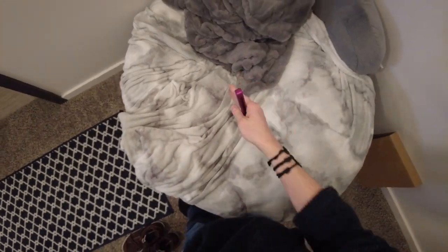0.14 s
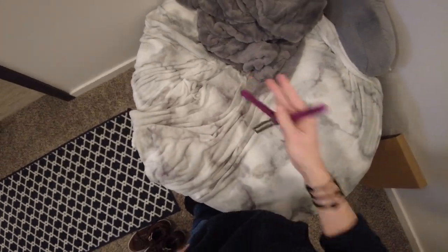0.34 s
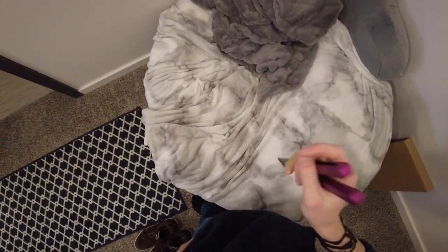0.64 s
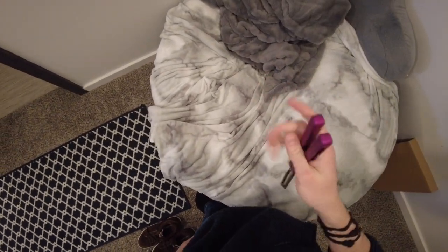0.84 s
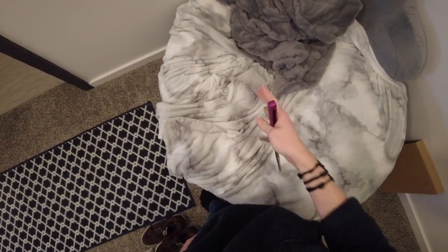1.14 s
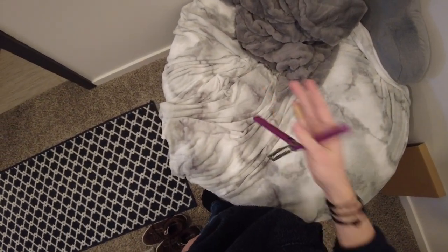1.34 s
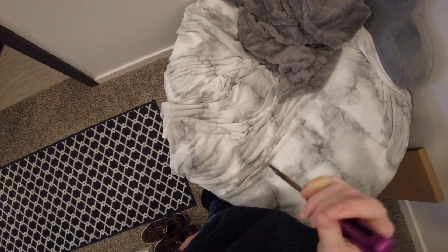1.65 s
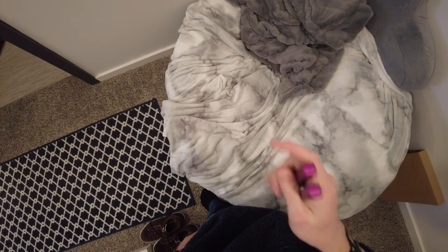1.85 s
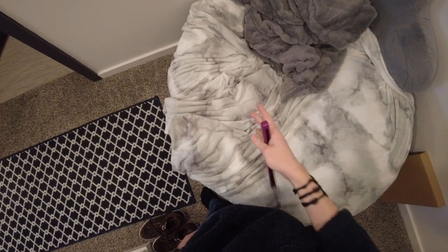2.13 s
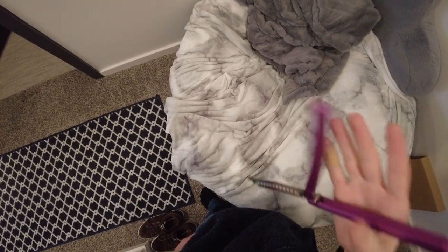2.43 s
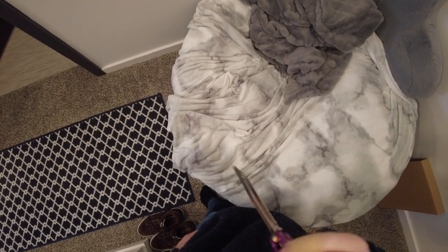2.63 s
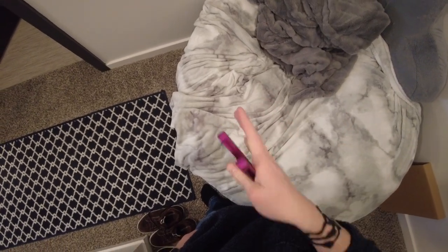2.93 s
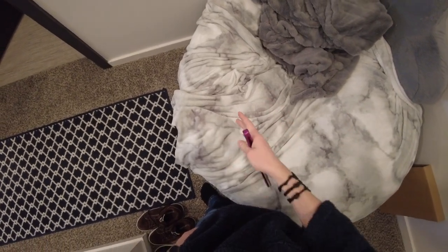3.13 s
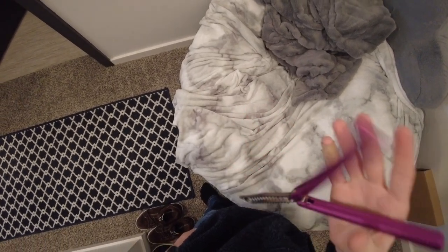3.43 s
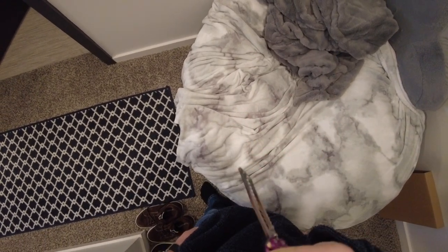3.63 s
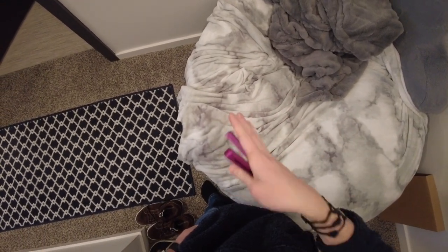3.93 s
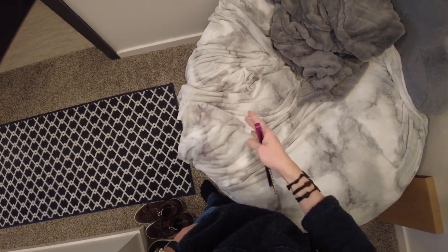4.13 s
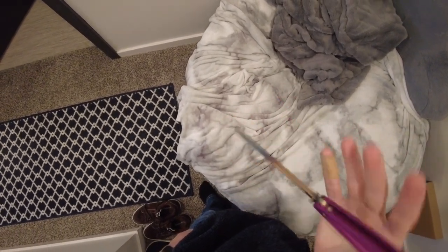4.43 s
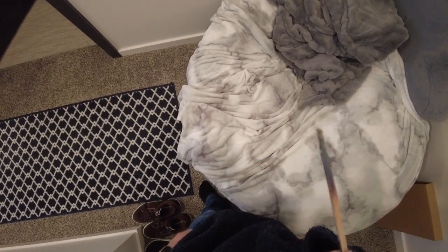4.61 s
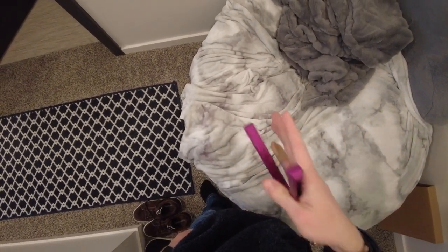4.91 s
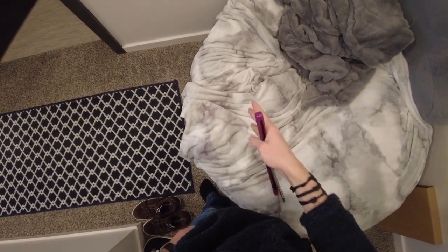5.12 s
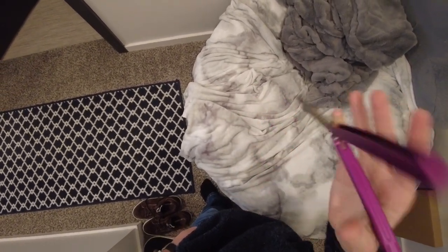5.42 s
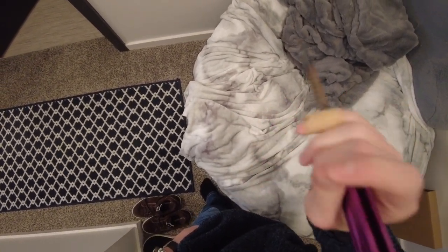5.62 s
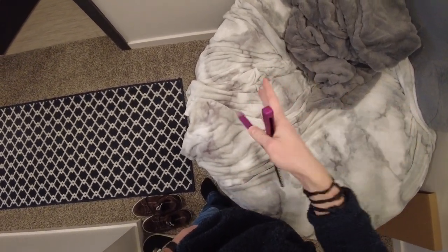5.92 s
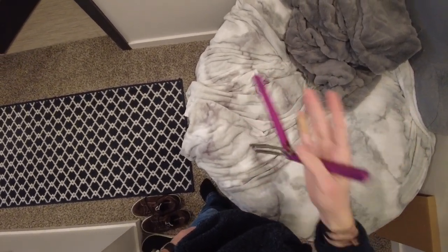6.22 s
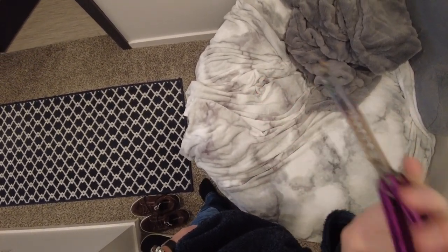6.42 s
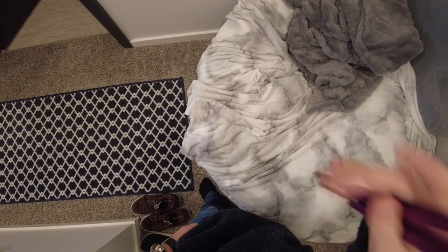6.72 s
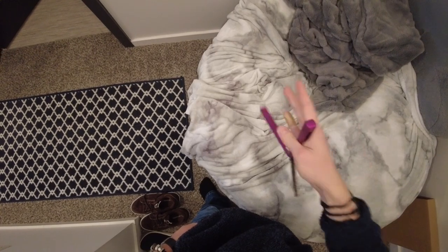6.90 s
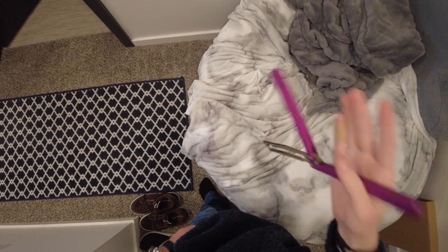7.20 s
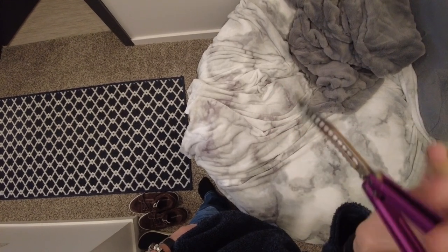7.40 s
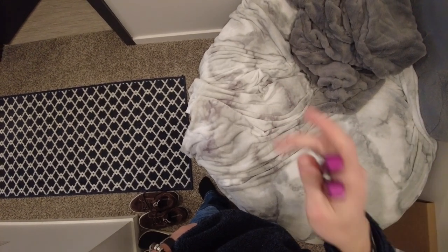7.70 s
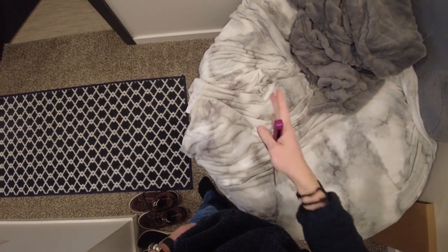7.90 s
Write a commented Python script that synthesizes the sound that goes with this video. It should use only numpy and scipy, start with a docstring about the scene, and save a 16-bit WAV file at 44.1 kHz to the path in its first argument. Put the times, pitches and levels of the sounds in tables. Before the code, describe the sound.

Metal handles of a flipped practice knife click and clatter shut about once a second, with brief bright ringing in a small room.

```python
"""A folding practice knife is flipped over a bed in a small carpeted room. First come a faint rumble, a low hum
and hiss, which stay throughout, and a soft rustle of the palm. Then the loose handle swings and stops twice
against the hand, and the room answers each tap. Next the handles meet and bounce on each other, faster and
faster, until they buzz to rest. This happens eight times, and now and then metal left free in the hand, or the
handles just closed, ring on."""
import sys
import numpy as np
from scipy import signal
from scipy.fft import rfft, irfft, next_fast_len
from scipy.io import wavfile
from scipy.ndimage import map_coordinates

SR = 44100
rng = np.random.default_rng(int(sys.argv[2]) if len(sys.argv) > 2 else 0)


def unload_wav(signal):
    """Save mono or channel-first audio to the path in sys.argv[1] as 16-bit WAV at rate SR, clipped to [-1, 1]."""
    wavfile.write(
        sys.argv[1],
        SR,
        np.round(np.clip(np.atleast_2d(signal).T, -1, 1) * 32767).astype(np.int16),
    )


N = 355049

# Tone colour of the rumble, the dull room noise and the microphone hiss: pitch_hz, relative_db
RUMBLE_COLOUR = [(8.8, -22), (15, 5.5), (39, 1), (91, -16.5), (119, -21), (150, -46), (200, -49),
                 (330, -120)]
AIR_COLOUR = [(88, -26.5), (150, -4.5), (350, -12), (382, -18.5), (416, -12), (681, -22.5), (1500, -25.5),
              (1950, -60), (3300, -120)]
HISS_COLOUR = [(700, -120), (1000, -3), (2500, -1), (6000, -8), (10000, -13), (12500, -20.5), (15000, -41)]
# The rumble swells as the body moves: time_s, level_db
RUMBLE_SWELLS = [(0.0, -64.5), (0.15, -62.5), (3.0, -62), (5.11, -65), (5.29, -57.5), (5.65, -65.5),
                 (5.94, -51.5), (6.14, -64), (6.39, -46), (6.7, -62.5), (7.2, -57.5), (7.33, -60),
                 (7.44, -48.5), (7.87, -65.5), (7.98, -52.5), (8.05, -51.5)]
# Narrow bands of hum: pitch_hz, level_db
HUM_BANDS = [(120, -79), (170, -86), (255, -87)]
# How alike the noise is in both ears: pitch_hz, likeness (1 is the same, 0 is unrelated)
EAR_LIKENESS = [(60, 1), (130, 0.96), (290, 0.64), (640, 0), (1400, 0.064), (5000, 0.52), (15000, 0.16)]
# The palm shifts on the handle: middle_s, width_s, level_db
PALM_SHIFTS = [(0.112, 0.033, -64.5), (1.28, 0.014, -63.5)]
# Single hits on the hand, and the handles' first meeting. A lean above 0 is louder on the left:
# start_s, clack_db, clack_hz, clink_db, sizzle_db, knock_db, lean_db, rebound_loss_db
SINGLE_TAPS = [(0.2246, -49, 1926, -49, -49, -58.5, -4, 27), (0.3853, -58, 2190, -52, -57.5, -64, 2, 35),
               (0.3902, -45.5, 2220, -42.5, -49, -68.5, -2, 16),
               (0.4163, -53, 2170, -54, -53.5, -74, -4, 36), (0.5981, -40, 2065, -50, -40, -71, -5, 18),
               (0.9659, -73, 2330, -61, -60, -80, -4, 32), (1.2442, -44, 2160, -45.5, -56.5, -70, 1, 14),
               (1.2733, -44.5, 2090, -50, -51.5, -63, -2, 10),
               (1.4198, -42, 2210, -43.5, -49, -67, 1.5, 15),
               (1.4676, -49.5, 2110, -53.5, -55.5, -69, -4, 24),
               (1.5972, -33.5, 2283, -55, -43, -70, -4.5, 32.5),
               (2.214, -42.5, 2340, -47.5, -51, -55.5, -1, 32),
               (2.348, -44.5, 2155, -44.5, -53.5, -62, 6, 33),
               (2.5568, -33, 2312, -39, -34.5, -58.5, -3, 29),
               (3.1983, -38, 2425, -46.5, -41.5, -50, -3, 30), (3.3425, -40.5, 2253, -35, -45, -59, -1, 16),
               (3.3656, -49, 2386, -40, -49.5, -66, 2, 14), (3.5222, -30, 2220, -53.5, -36.5, -55, -3, 30),
               (3.9708, -53, 2314, -68, -73, -72, -2, 33.5), (4.122, -50.5, 2290, -68, -64, -77, 1, 29),
               (4.1685, -41, 2253, -66, -47.5, -56, -0.5, 29.5),
               (4.285, -42.5, 2223, -40, -50.5, -65.5, -0.5, 11),
               (4.4653, -29, 2182, -52, -34.5, -54.5, -2, 22),
               (5.161, -34, 2020, -34.5, -36.5, -46, 0.5, 19.5),
               (5.299, -40, 2250, -34.5, -45.5, -60, 0, 9.5), (5.3378, -44.5, 2250, -44, -45.5, -69, 1, 13),
               (5.5064, -39.5, 2295, -48, -41.5, -60.5, -1, 30), (5.917, -69, 2430, -70, -71, -84, -1, 30),
               (6.0852, -39.5, 2080, -40.5, -45.5, -51, 1, 14),
               (6.2288, -40.5, 2275, -33, -43, -58.5, -1, 15), (6.2633, -53, 2420, -42, -54.5, -69, 0, 6),
               (6.3837, -38, 2170, -44, -35.5, -53, -4, 26.5), (6.8439, -57, 2370, -65, -68, -84, -1, 25.5),
               (7.0677, -37, 2117, -39, -41.5, -49.5, 2.5, 24),
               (7.2219, -39, 2380, -49, -38.5, -69, -1, 27), (7.2242, -47, 2300, -40.5, -53, -68, 1, 6),
               (7.2682, -47, 2130, -44, -52, -69, -2, 28), (7.3786, -40, 2110, -43, -40, -55.5, -5, 30),
               (7.8328, -62, 2450, -62, -69, -89, 1, 26.5), (8.0334, -39.5, 1960, -43, -47, -51, -1, 10)]
# A hit rings groups of tones in the handles and blade. A fade_s is the time to fall by 60 dB.
# Tones that follow the hit's pitch: pitch_ratio, level_db, free_ring_s, after_ring_db, fade_s
CLACK_TONES = [(1, 1, 0.0037, -28, 0.23), (.93, -32, 0.0035, -25, .06)]
CLINK_TONES = [(0.997, 2, 0.0016, -23.5, 0.12), (1.2, -4.5, 0.00043, -20.5, 0.05)]
# Fixed tones of the metal and the air between the handles:
# pitch_hz, level_db, free_ring_s, after_ring_db, fade_s
SIZZLE_TONES = [(4530, -4, 0.0012, -10, 0.062), (3900, -13.5, 0.00045, -16, 0.019),
                (5985, 0, 0.00095, -14, 0.027), (6528, -9.5, 0.0041, -10.5, 0.11),
                (7386, -12.5, 0.0039, -6.5, 0.12), (7614, -11, 0.003, -8.5, 0.093),
                (5380, -20, 0.0024, -11.5, 0.033), (8060, -23.5, 0.00024, -13.5, 0.1),
                (9500, -14, 0.00085, -10.5, 0.045), (10820, -15.5, 0.0038, -6.5, 0.17),
                (12000, -27, 0.0012, -12.5, .05), (13020, -15.5, .002, -18.5, .04),
                (14600, -16, 0.0026, -2.5, 0.098)]
KNOCK_TONES = [(540, 2, 0.0014, -12.5, .06), (1843, 7, 0.0013, -11, 0.059), (700, -7.5, 0.004, -17, .04)]
BODY_TONES = [(1303, -28.5, 0.0024, 1.5, .05), (928, -30.5, 0.0027, -10.5, .04),
              (1764, -24, 0.0006, -13, 0.1)]
PUFF_TONES = [(1205, 3.5, .0012, -39.5, .01), (620, -11.5, 0.00083, -37.5, .01)]
# Echoes off the hand, bed and wall: left_delay_s, right_delay_s, relative_db
NEAR_SURFACES = [(.0021, .0026, -18.5), (.0038, .0033, -8), (.0082, .0091, -9)]
# How long the room rings: pitch_hz, fade_s
ROOM_FADES = [(300, 0.3), (1200, 0.27), (2300, .25), (3000, 0.3), (4500, 0.29), (8000, 0.28), (15000, 0.11)]
# A flurry is one run of hits as the handles close: start_s, end_s, last_clack_hz, clink_top_s,
# clink_top_hz, last_clink_hz, sizzle_db, knock_db, first_lean_db, room_before_db, room_during_db
FLURRY_SHAPES = [(.6, 0.771, 2400, .69, 3150, 2890, -37, -68, -4, -0.5, -3),
                 (1.602, 1.825, 2410, 1.71, 3327, 3010, -36, -70.5, -2.5, -4.5, -5.5),
                 (2.56, 2.816, 2553, 2.715, 3430, 2960, -36, -67, -3, 0.5, -10.5),
                 (3.52, 3.8, 2460, 3.72, 3470, 2615, -36, -63, -3, -2.5, -10.5),
                 (4.49, 4.785, 2567, 4.665, 3220, 2770, -37.5, -71, -4, 0, -12.5),
                 (5.566, 5.722, 2540, 5.63, 3100, 2860, -33.5, -71, -7, -3, -9.5),
                 (6.42, 6.663, 2470, 6.64, 3360, 3100, -37, -66, -6, -4.5, -8.5),
                 (7.397, 7.694, 2200, 7.575, 3530, 2680, -36, -55.5, -7.5, -4, -8)]
# The handles rattle on each other, with full and dull clinks by turns: start_s, clack_db, clink_db
RATTLE_HITS = [(0.6363, -34, -35.5), (.656, -34.5, -40), (0.6667, -30.5, -35.5), (0.6761, -32.5, -53),
               (0.6871, -32.5, -40), (1.6271, -28.5, -36.5), (1.6487, -27.5, -48), (1.6545, -43.5, -45.5),
               (1.6664, -23.5, -39), (1.6758, -44, -49), (1.6832, -28.5, -52.5), (1.6919, -35.5, -48),
               (1.6976, -25, -34), (1.7099, -28.5, -50), (1.721, -25, -37.5), (1.7313, -25.5, -44),
               (2.5822, -24.5, -38), (2.5993, -22, -41), (2.6156, -25.5, -28.5), (2.6294, -30, -49.5),
               (2.6482, -26, -30.5), (2.6746, -35, -46.5), (2.6979, -26.5, -31), (2.7093, -29, -47.5),
               (2.716, -21.5, -24), (2.7203, -27.5, -33.5), (2.7269, -27, -24.5), (2.733, -35, -35.5),
               (2.7396, -27.5, -22), (2.7495, -26.5, -24.5), (2.758, -29.5, -28), (3.5536, -24.5, -32.5),
               (3.5814, -27, -52), (3.6073, -23, -34), (3.6348, -27.5, -46), (3.66, -22.5, -28),
               (3.6817, -27.5, -42.5), (3.6946, -23, -28.5), (3.7029, -25.5, -42.5), (3.7096, -24.5, -24),
               (3.7169, -28, -39), (3.7241, -26, -24), (3.7387, -28, -21), (3.751, -32.5, -28.5),
               (3.756, -32, -29), (4.5033, -24, -38.5), (4.5402, -32, -46), (4.5746, -21, -30),
               (4.6081, -30, -41), (4.6245, -19.5, -25.5), (4.633, -24.5, -38.5), (4.6424, -20, -23.5),
               (4.6533, -35, -43), (4.6645, -29, -26.5), (4.68, -34, -48), (4.7162, -33, -40),
               (4.7366, -41, -50), (4.7527, -39.5, -34.5), (5.5645, -33, -36), (5.5837, -32, -44.5),
               (5.5931, -26.5, -35), (5.6, -27, -51), (5.607, -36, -30), (5.6161, -35, -48),
               (5.6274, -29.5, -43), (5.64, -41, -39), (5.6516, -30.5, -35), (5.6602, -36, -43),
               (5.6673, -31.5, -34.5), (6.4181, -30.5, -36), (6.446, -34, -58), (6.4705, -28, -33.5),
               (6.5011, -35, -42.5), (6.519, -30.5, -29), (6.5304, -31, -35.5), (6.5393, -32.5, -23.5),
               (6.5485, -32, -31), (6.5586, -33, -26), (6.5685, -42, -46), (6.583, -37, -37),
               (6.6007, -52, -40), (6.6197, -39.5, -32), (6.6319, -48, -44), (6.6392, -37.5, -38),
               (6.6444, -41, -32), (7.4262, -33, -30), (7.4573, -29.5, -52.5), (7.4818, -31.5, -29.5),
               (7.5008, -29, -51), (7.5168, -27, -32), (7.5212, -46, -49), (7.5298, -27.5, -43.5),
               (7.5421, -28, -29.5), (7.554, -30, -41), (7.5656, -33, -30), (7.5764, -30.5, -45),
               (7.5871, -36, -28), (7.5956, -32.5, -36), (7.6051, -38.5, -28), (7.6115, -31, -35)]
# The quick bounces that end each flurry: start_s, first_gap_s, gap_ratio, clack_db, clink_db, puff_db
BOUNCE_RUNS = [(.696, .007, 0.91, -43.5, -42, -57), (1.7388, .007, 0.92, -32.5, -32.5, -42),
               (2.7663, .0062, 0.87, -31, -25.5, -40), (3.762, .0066, 0.87, -30.5, -28.5, -42.5),
               (4.7631, .006, 0.69, -51, -62.5, -64), (5.6754, .0058, 0.84, -36.5, -32.5, -48),
               (6.651, .0068, 0.69, -39, -42, -72), (7.618, .0053, 0.91, -35.5, -29, -41.5)]
# Thin tones ring on, from metal left free in the hand or from the closed handles after a flurry: # start_s,
# level_db, pitch_hz, fade_s
LINGERING_TONES = [(.9645, -61, 2370, 0.18), (1.2446, -55, 2340, 0.19), (1.2742, -53.5, 2336, 0.16),
                   (2.806, -47, 3000, 0.35), (3.8, -44.5, 2697, .34), (6.8431, -64.5, 2330, .15),
                   (7.669, -50, 2826, 0.31)]

TIME_S = np.arange(N) / SR
CLACK_HZ, CLINK_HZ = 2334, 2828  # resting pitches


def amp(db):
    """Turn decibels into a number to multiply by."""
    return 10 ** (np.asarray(db) / 20)


def along(points, hz):
    """Read between the rows of a (pitch_hz, value) table on a log pitch scale."""
    pitches, values = np.transpose(points)
    return np.interp(np.log(hz + 1), np.log(pitches + 1), values)


def wobble(per_s):
    """A smooth curve through per_s random points a second."""
    return map_coordinates(rng.standard_normal(int(N * per_s / SR) + 4), [TIME_S * per_s])


def filtered(sound, gain):
    """Turn each frequency of a sound up or down by gain(hz)."""
    size = next_fast_len(N + SR // 2)
    return irfft(rfft(sound, size) * gain(np.fft.rfftfreq(size, 1 / SR)), size)[..., :N]


def stereo_noise(gain):
    """Noise of average power 1, coloured by gain(hz) and alike in both ears in the bass."""
    def split(hz):
        angle = np.arccos(np.clip(along(EAR_LIKENESS, hz), -1, 1)) / 2
        return gain(hz) * [np.cos(angle), np.sin(angle)]
    shared, opposite = filtered(rng.standard_normal((2, N)), split)
    noise = np.array([shared + opposite, shared - opposite])
    return noise / np.sqrt(np.mean(noise ** 2) + 1e-20)


def noise_band(middle_hz, half_width_hz):
    """Noise gathered around one pitch."""
    return stereo_noise(lambda hz: 1 / (1 + ((hz - middle_hz) / half_width_hz) ** 2))


def background():
    """Rumble that swells as the body moves, dull room noise, a wavering hum and microphone hiss."""
    coloured = lambda colour: stereo_noise(lambda hz: amp(along(colour, hz)))
    rumble_db = np.interp(TIME_S, *np.transpose(RUMBLE_SWELLS)) + 2.5 * wobble(4.4)
    rumble = amp(rumble_db) * coloured(RUMBLE_COLOUR) * amp([[-1.4], [1.4]])  # louder on the right
    flurry_ends = sum(np.exp(-((TIME_S - end) / 0.09) ** 2) for _, end, *_ in FLURRY_SHAPES)
    air = amp(-79 + 5 * flurry_ends + 2.4 * wobble(16)) * coloured(AIR_COLOUR)
    hum = sum(amp(db) * noise_band(hz, half_width_hz=6) for hz, db in HUM_BANDS)
    hiss_db = -83.5 + 0.7 * wobble(1.8) + 5.5 * np.exp(-TIME_S / 0.26)  # louder at first
    return rumble + air + hum + amp(hiss_db) * coloured(HISS_COLOUR)


def palm_rustle():
    """Skin slides on metal in soft, dull swells."""
    swell = sum(amp(db) * np.exp(-((TIME_S - middle) / width) ** 2) for middle, width, db in PALM_SHIFTS)
    return swell * noise_band(600, half_width_hz=300)


def tap_hits(rebounds=3, flight_s=0.0056, caught_db=20):
    """List the single taps. The handle rebounds unless it loses so much that the hand catches it."""
    taps = np.array(SINGLE_TAPS)
    delays_s = np.cumsum(flight_s * (1 + 0.12 * rng.standard_normal((len(taps), rebounds))), axis=1)
    is_time = np.array([1, 0, 0, 0, 0, 0, 0])
    is_level = np.array([0, 1, 0, 1, 1, 1, 0])
    hits = list(taps[:, :-1])
    for tap, loss_db, delays in zip(taps[:, :-1], taps[:, -1], delays_s):
        if loss_db < caught_db:
            for k, delay in enumerate(delays):  # each further rebound is 1 dB softer
                hits.append(tap + delay * is_time - (loss_db + k) * is_level)
    start_s, clack_db, clack_hz, clink_db, *rest = np.transpose(hits)
    return np.array([start_s, clack_db, clack_hz, clink_db, np.full_like(start_s, CLINK_HZ), *rest])


def ring(start_s, level_db, lean_db, tones, pitch_scale=1, detune=0, scatter_db=0, spread=0, loose=0):
    """Each hit rings freely for a moment, until the grip chokes it to a weak, unsteady after-ring."""
    t = np.arange(SR // 16, dtype=np.float32) / SR
    chance = rng.standard_normal((len(start_s), len(tones), 4), dtype=np.float32)
    steps = rng.standard_normal((len(start_s), len(t)), dtype=np.float32)
    drift = loose * np.cumsum(steps, axis=1)  # slack in the pivots
    soft_edges = (1 - np.exp(-t / 0.000081)) * np.cos(np.pi / 2 * t / t[-1])
    left, right = np.zeros((2, len(start_s), len(t)))
    for tone, luck in zip(tones, chance.transpose(1, 2, 0)[..., None]):
        pitch, db, free_s, after_db, fade_s = tone
        pitch_luck, level_luck, left_luck, right_luck = luck
        dying = np.exp(-(t / free_s) ** 3) + amp(after_db - 60 * t / fade_s)
        size = amp(db + scatter_db * level_luck) * dying * soft_edges
        hz = pitch * np.reshape(pitch_scale, (-1, 1)) * (1 + detune * pitch_luck)
        phase = 2 * np.pi * hz * t + drift
        left += size * np.sin(phase + spread * left_luck)  # a tone reaches each ear from its own angle
        right += size * np.sin(phase + spread * right_luck)
    left *= amp(level_db + lean_db / 2)[:, None]
    right *= amp(level_db - lean_db / 2)[:, None]
    places = np.round(start_s * SR).astype(int)[:, None] + np.arange(len(t))
    return np.array([np.bincount(places.ravel(), ear.ravel(), N)[:N] for ear in (left, right)])


def cut_bass(sound, hz):
    """Weaken everything below hz."""
    return signal.sosfilt(signal.butter(2, hz, "high", fs=SR, output="sos"), sound)


def bright_metal(hits):
    """Every hit rings the same metal: a clack, a higher clink and a thin sizzle on top."""
    start_s, clack_db, clack_hz, clink_db, clink_hz, sizzle_db, _, lean_db = hits
    clack = ring(start_s, clack_db, 0.1 * lean_db, CLACK_TONES, clack_hz,
                 detune=0.009, scatter_db=0.3, spread=0.25, loose=0.07)
    clink = ring(start_s, clink_db, 0.3 * lean_db, CLINK_TONES, clink_hz,
                 detune=0.005, scatter_db=1.5, spread=0.25, loose=0.06)
    sizzle = ring(start_s, sizzle_db, lean_db, SIZZLE_TONES,
                  detune=0.0068, scatter_db=3, spread=0.92, loose=0.15)
    return cut_bass(cut_bass(clack + clink + sizzle, hz=1150), hz=1000)


def dull_knocks(hits):
    """The low part of a hit: a knock, and air that the closing handles push with the whole blow."""
    start_s, clack_db, _, clink_db, _, _, knock_db, lean_db = hits
    whole_db = 10 * np.log10(amp(clack_db) ** 2 + amp(clink_db) ** 2)
    knock = ring(start_s, knock_db, 0.085 * lean_db, KNOCK_TONES,
                 detune=0.032, scatter_db=3, spread=0.56, loose=0.072)
    body = ring(start_s, whole_db, 0.11 * lean_db, BODY_TONES,
                detune=0.034, scatter_db=0.5, spread=0.78, loose=0.053)
    return cut_bass(knock + body, hz=267)


def arm_reach_db(pull_in_s=0.18, hold_s=0.14):
    """More room is heard with the arm out for the taps, less with it pulled in for a flurry."""
    points = []
    for start, end, *_, before_db, during_db in FLURRY_SHAPES:
        points += [(start - pull_in_s, before_db), (start, during_db), (end + hold_s, during_db)]
    return np.interp(TIME_S, *np.transpose(points))


def near_echoes(sound):
    """The nearest surfaces each send back one copy within a hundredth of a second."""
    delayed = lambda ear, delay_s: np.pad(ear, (round(delay_s * SR), 0))[:N]
    return sum(amp(db) * np.array([delayed(sound[0], left_s), delayed(sound[1], right_s)])
               for left_s, right_s, db in NEAR_SURFACES)


def room_ring(sound, tail_count=4):
    """The room rings briefly after each hit, with a soft, diffuse tail."""
    hz, t, noise = signal.stft(rng.standard_normal((tail_count, 2, SR // 2)), SR, nperseg=128)
    fading = amp(-60 * t / along(ROOM_FADES, hz)[:, None])  # each pitch fades at its own speed
    tails = signal.istft(noise * fading, SR, nperseg=128)[1]
    whose_turn = np.arange(N) // 1024 % tail_count  # random tails take turns to avoid repetition
    out = np.zeros((2, N))
    for k, tail in enumerate(tails):
        part = np.pad(sound * (whose_turn == k), (220, 0))  # the first wall is under two metres away
        out += signal.fftconvolve(part[None], tail / np.linalg.norm(tail[0]), axes=1)[:, :N]
    return out


def flurry_hits(hit_s, clack_db, clink_db, rise_s=0.13):
    """List a flurry's hits. As the grip closes, pitches bend and sizzle gives way to knock."""
    shapes = np.array(FLURRY_SHAPES)
    own_shape = shapes[np.searchsorted(shapes[:, 0], hit_s) - 1, :-2].T
    start, end, last_clack_hz, top_s, top_hz, last_clink_hz, sizzle_db, knock_db, lean_db = own_shape
    progress = np.clip((hit_s - start) / (end - start), 0, 1)
    clack_hz = CLACK_HZ + (last_clack_hz - CLACK_HZ) * progress ** 2
    # The clink climbs and falls as the gap between the handles changes.
    rising_hz = CLINK_HZ + (top_hz - CLINK_HZ) * np.clip(1 + (hit_s - top_s) / rise_s, 0, 1)
    falling_hz = top_hz + (last_clink_hz - top_hz) * np.clip((hit_s - top_s) / (end - top_s), 0, 1)
    clink_hz = np.where(hit_s < top_s, rising_hz, falling_hz)
    harder_db = clack_db + 30  # how far above a middling clack of -30 dB
    sizzle_db = sizzle_db + 0.68 * harder_db - 6 * (progress - 0.5)
    knock_db = knock_db + 0.3 * harder_db + 8 * (progress - 0.5)
    lean_db = lean_db * (1 - progress)  # the knife moves to the centre
    return np.array([hit_s, clack_db, clack_hz, clink_db, clink_hz, sizzle_db, knock_db, lean_db])


def quick_bounces(count=24, clamp_db_per_s=8000):
    """List the bounces: each is shorter and softer than the last, until the fingers clamp the handles."""
    k, rows = np.arange(count), []
    for (start, gap, ratio, *levels), (_, end, *_) in zip(BOUNCE_RUNS, FLURRY_SHAPES):
        hit_s = start + gap * (1 - ratio ** k) / (1 - ratio)
        softer_db = 0.86 * 20 * np.log10(ratio) * k  # a shorter flight lands more slowly
        clamp_db = -clamp_db_per_s * np.maximum(hit_s - end, 0)
        rows.append(np.column_stack([hit_s] + [db + softer_db + clamp_db for db in levels]))
    return np.vstack(rows).T


def air_puffs(hits, puff_db):
    """Quick bounces squeeze out puffs of air, all the same shape, which blend into a rising buzz."""
    start_s, *_, lean_db = hits
    return cut_bass(ring(start_s, puff_db, lean_db, PUFF_TONES), hz=267)


def lingering_ring(waver=0.006):
    """Metal left free in the hand, or the handles just closed, ring on in thin, slightly unsteady tones."""
    unsteady_s = np.cumsum(1 + waver * wobble(60)) / SR
    out = np.zeros(N)
    for start, db, hz, fade_s in LINGERING_TONES:
        size = (TIME_S > start) * amp(db - 60 * np.maximum(TIME_S - start, 0) / fade_s)
        out += size * np.sin(2 * np.pi * hz * (unsteady_s - unsteady_s[round(start * SR)]))
    return out


def scene():
    """Add up the knife, the room's answer, the palm and the background."""
    hits = np.hstack([tap_hits(), flurry_hits(*np.transpose(RATTLE_HITS))])
    bounce_s, clack_db, clink_db, puff_db = quick_bounces()
    bounces = flurry_hits(bounce_s, clack_db, clink_db)
    metal = bright_metal(np.hstack([hits, bounces]))
    knife = amp(-1) * (metal + dull_knocks(hits) + air_puffs(bounces, puff_db) + lingering_ring())
    into_room = amp(arm_reach_db()) * knife
    room = near_echoes(into_room) + room_ring(into_room.mean(axis=0))
    return knife + room + palm_rustle() + background()


def record(dry):
    """The microphone turns the highest treble down by 10 dB and cuts off all sound above its limit."""
    thin_hz, limit_hz = 15500, 16900
    thinned = lambda hz: amp(-5 * (1 + np.tanh((hz - thin_hz) / 250)))
    return filtered(dry, lambda hz: thinned(hz) / (1 + (hz / limit_hz) ** 600))


dry = scene()
out = record(dry)
unload_wav(out)
```